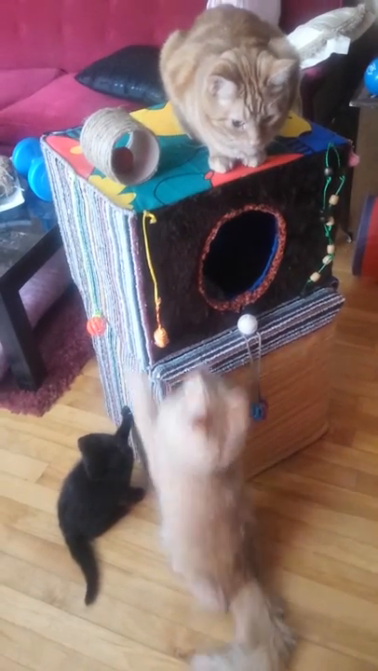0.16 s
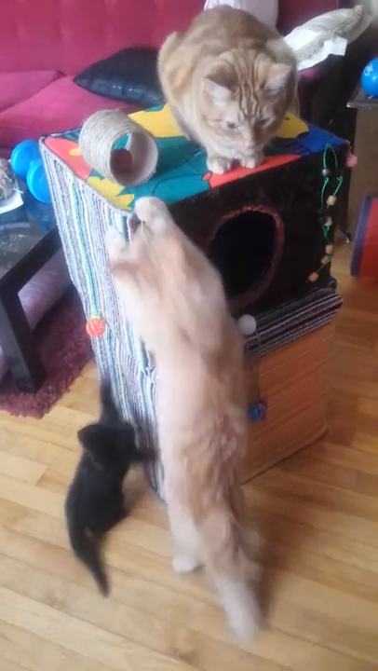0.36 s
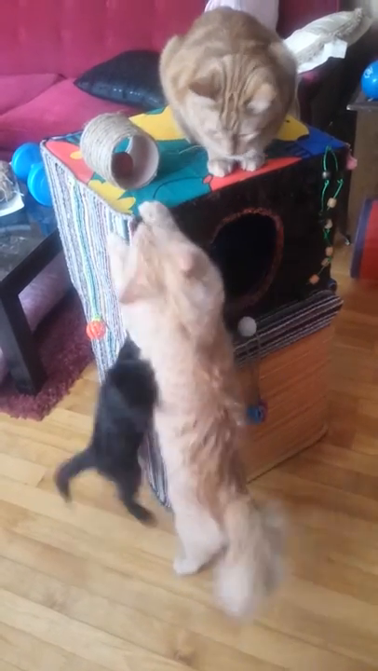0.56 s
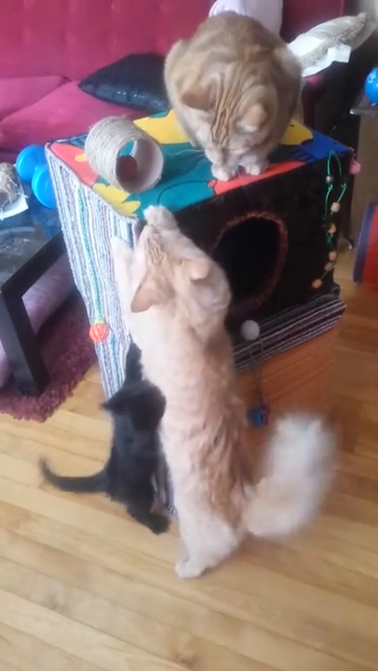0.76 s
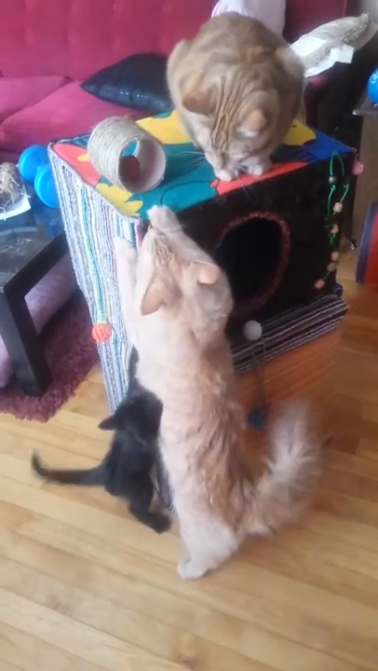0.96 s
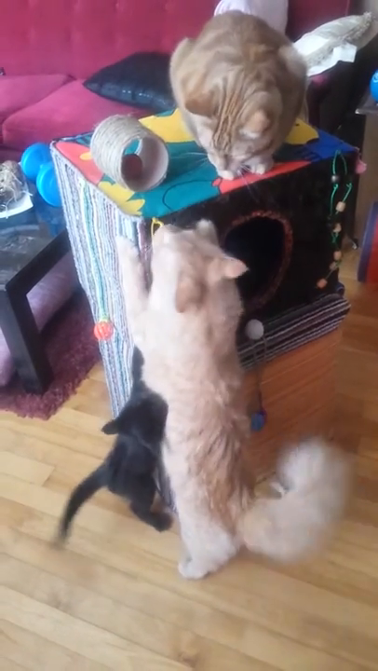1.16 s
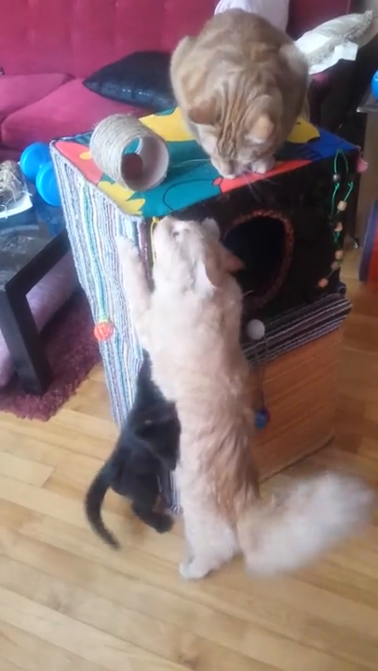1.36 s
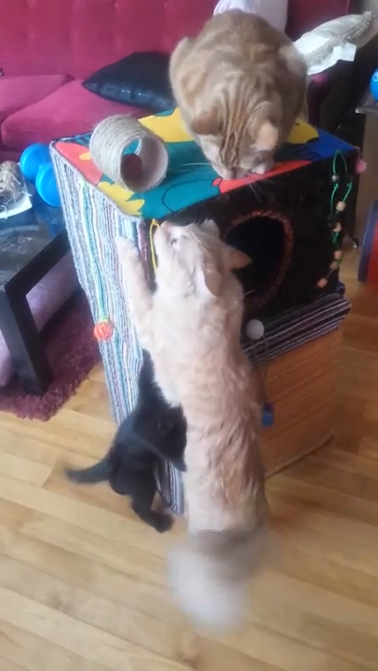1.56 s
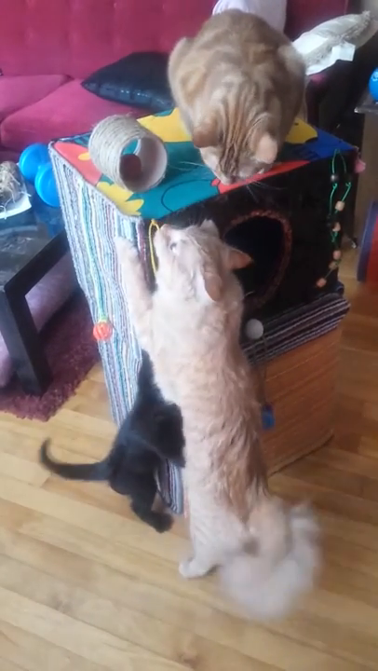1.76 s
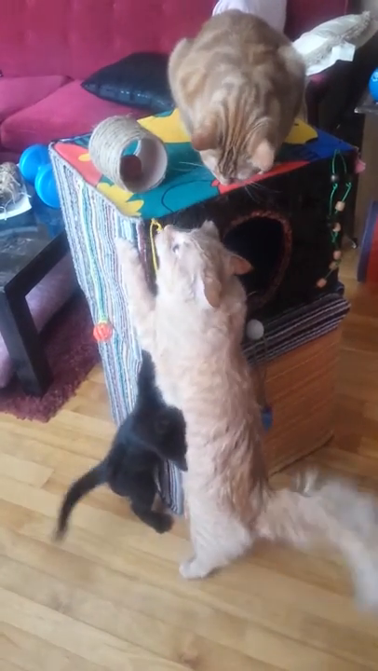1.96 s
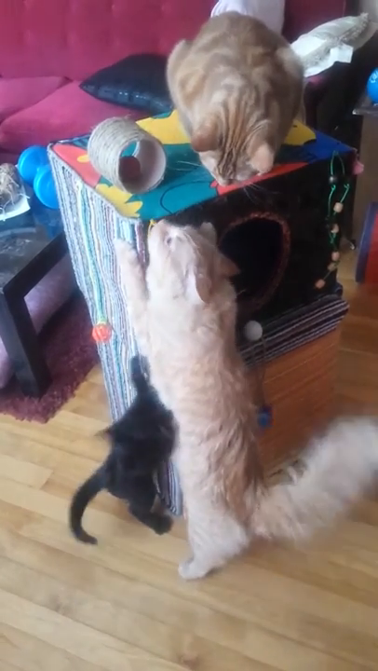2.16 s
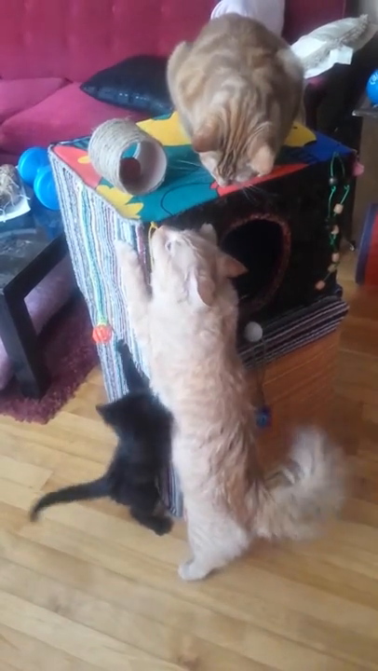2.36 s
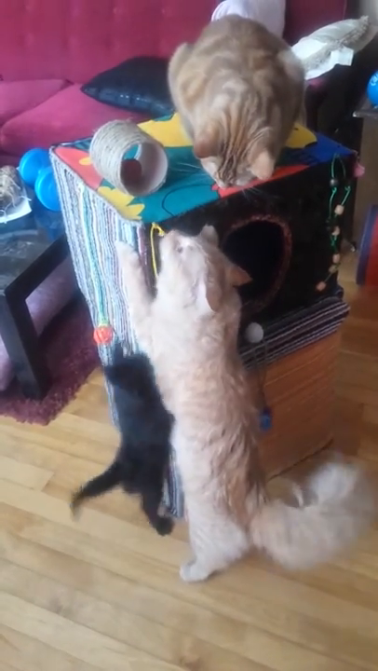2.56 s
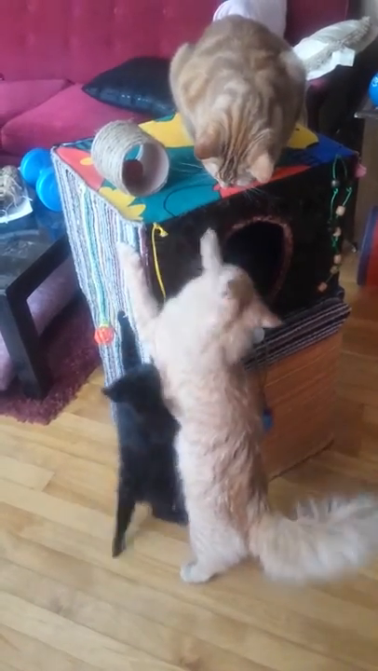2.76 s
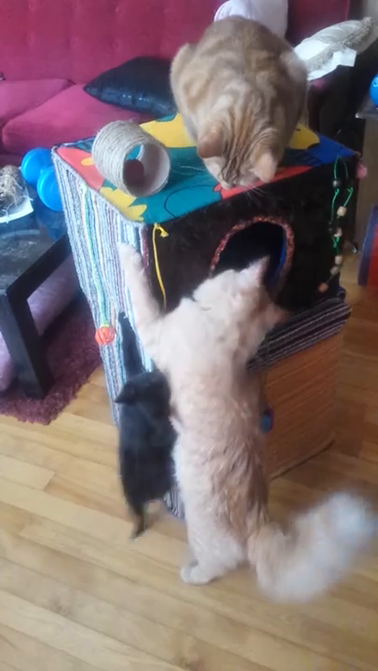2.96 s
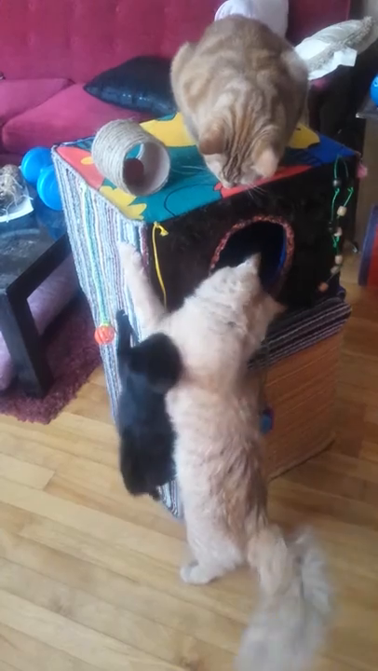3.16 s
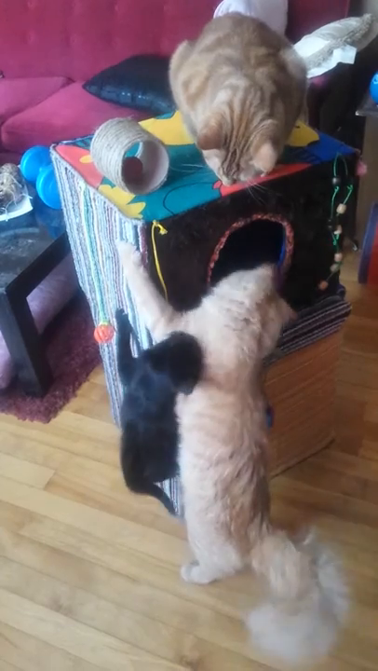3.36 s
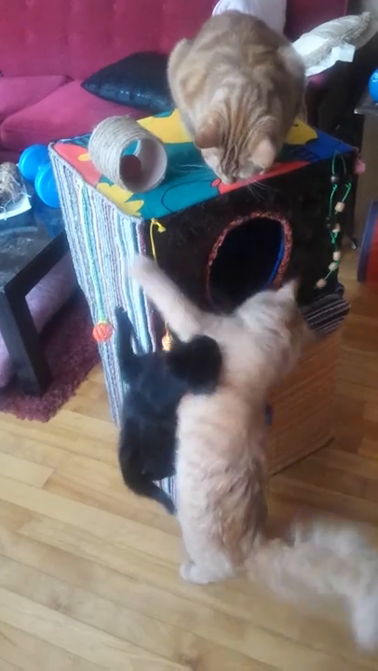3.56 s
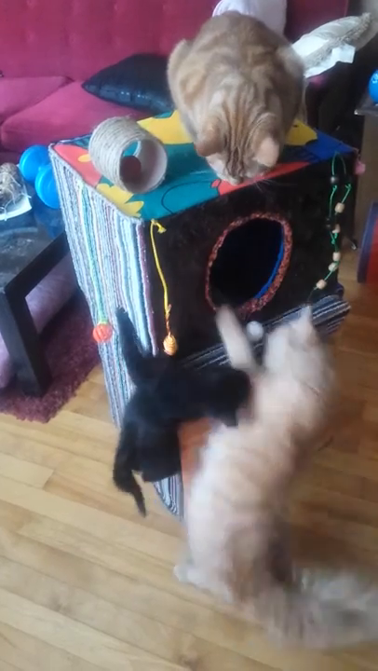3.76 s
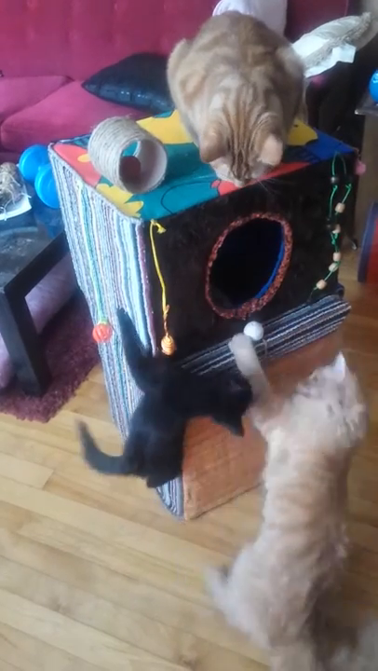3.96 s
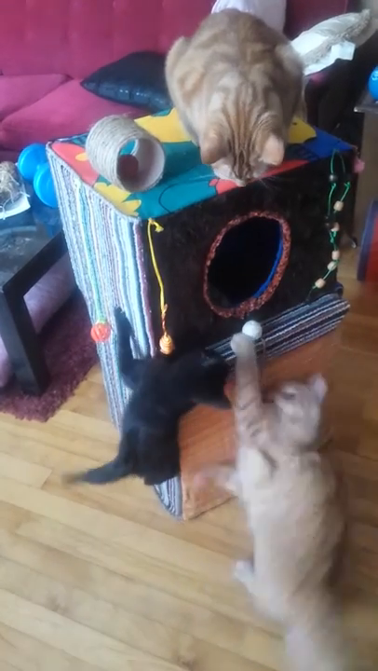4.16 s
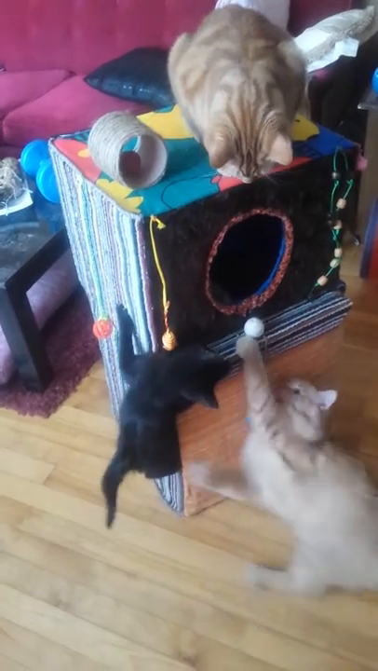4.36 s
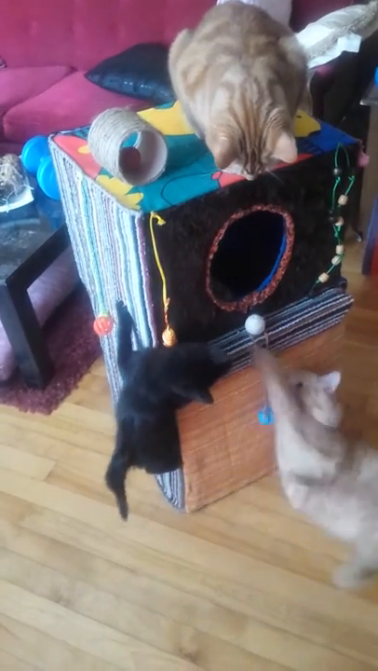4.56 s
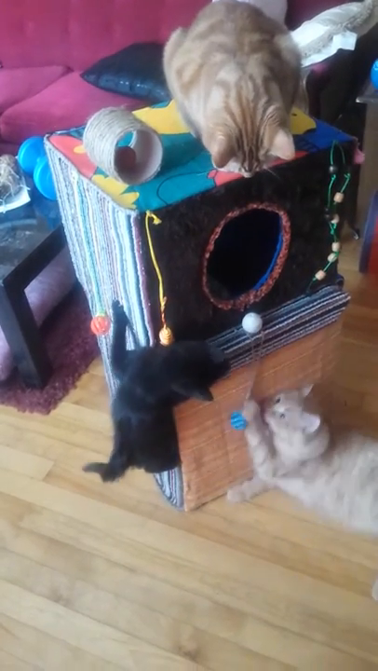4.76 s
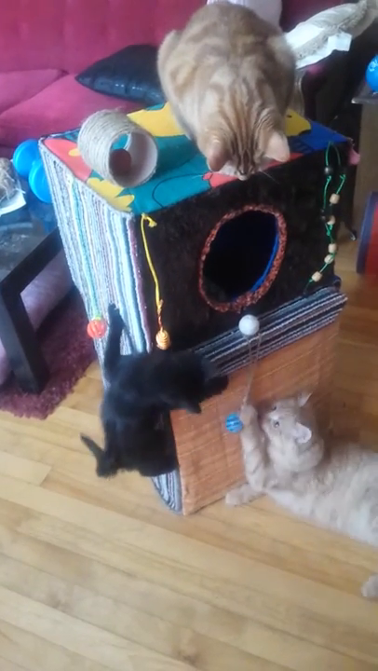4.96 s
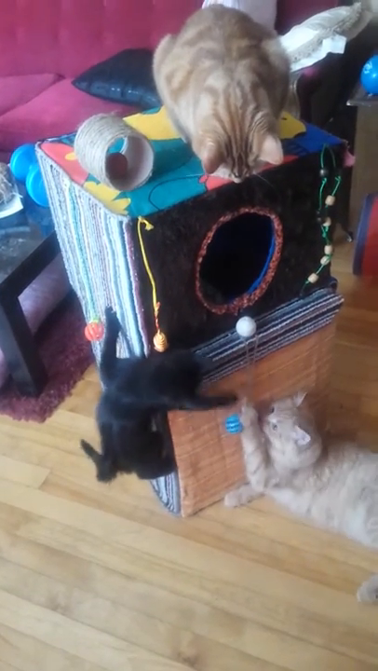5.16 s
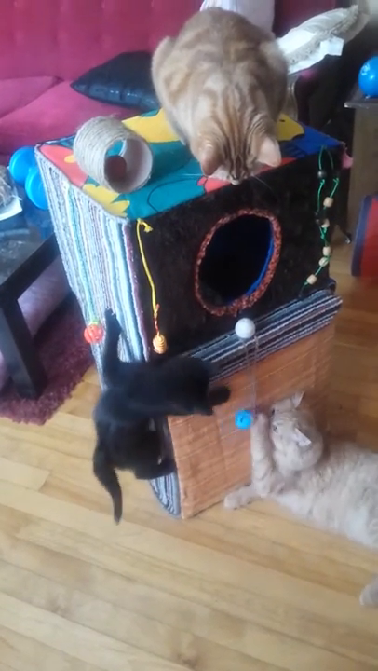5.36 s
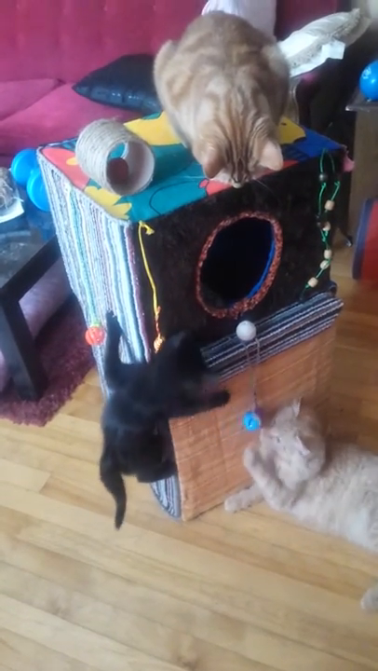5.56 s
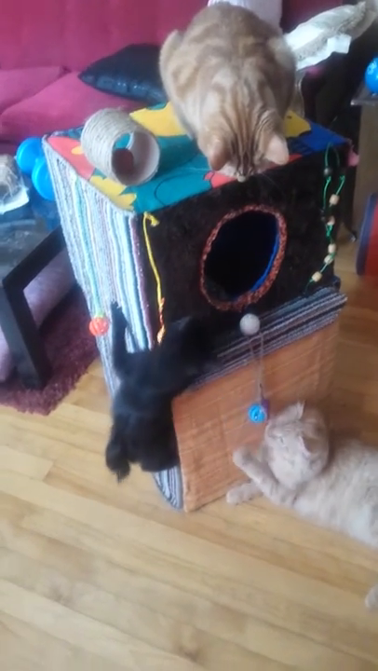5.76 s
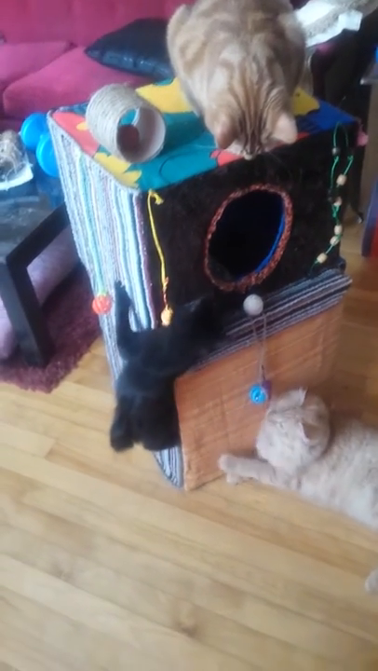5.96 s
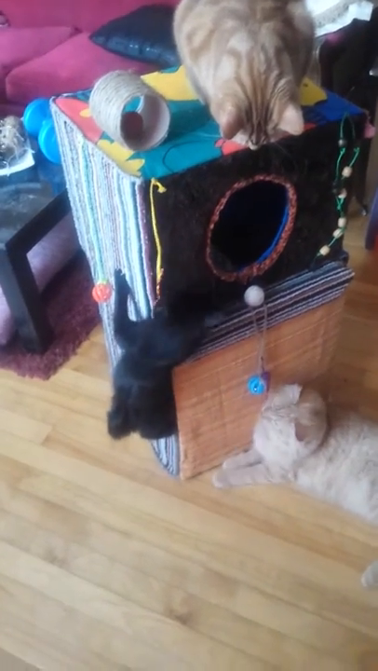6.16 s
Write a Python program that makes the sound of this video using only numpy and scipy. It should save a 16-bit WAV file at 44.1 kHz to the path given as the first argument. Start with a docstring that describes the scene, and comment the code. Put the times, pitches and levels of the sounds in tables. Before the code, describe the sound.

Kittens paw at a hollow cloth-covered box with soft thumps and claw scratches, building to a burst of knocks, clacks and a tiny bell jingle.

```python
"""In a quiet living room, kittens paw at and climb a cloth-covered box.
Paws excite the decaying modes of its hollow panels; claws tick as short noise bursts and rasp as
trains of snagged threads. A dangling toy jingles as its pellet excites the modes of a small bell.
An appliance hums and rushes as wavering sines and filtered noise; the microphones hiss and
lift the treble."""
import sys
import numpy as np
from scipy import signal
from scipy.fft import rfft, irfft, next_fast_len
from scipy.io import wavfile
from scipy.ndimage import map_coordinates

SR = 44100
rng = np.random.default_rng(int(sys.argv[2]) if len(sys.argv) > 2 else 0)


def store_wav(level_fs):
    """Save 16-bit WAV to argv[1]."""
    pcm = np.round(np.clip(np.atleast_2d(level_fs), -1, 1) * 32767)
    wavfile.write(sys.argv[1], SR, pcm.T.astype(np.int16))


N = 273861
T = np.arange(N) / SR  # time in the scene, s
AGE = T[:SR * 2 // 5]  # time since a contact, s; each contact sounds for 0.4 s


def amp(db):
    """Level: decibels become an amplitude gain."""
    return 10 ** (np.asarray(db) / 20)


def unit(x):
    """Normalization: the signal is scaled to rms 1."""
    return x / np.sqrt(np.mean(x ** 2) + 1e-20)


def along(points, hz):
    """Logarithmic frequency scale: (Hz, value) points are interpolated along it."""
    point_hz, values = np.transpose(points)
    return np.interp(np.log(hz + 1), np.log(point_hz + 1), values)


def fade(t60):
    """Exponential decay: the amplitude is 60 dB down after t60 seconds."""
    return np.exp(-np.log(1000) * AGE / t60)


def wobble(rate):
    """Slow random modulation: a smooth curve through `rate` random knots a second."""
    knots = rng.standard_normal(int(N * rate / SR) + 4)
    return map_coordinates(knots, [T * rate])


def filtered(x, response):
    """Linear filtering: the spectrum is multiplied by a response of frequency."""
    n = x.shape[-1]
    padded = next_fast_len(n + SR // 8)
    hz = np.fft.rfftfreq(padded, 1 / SR)
    return irfft(rfft(x, padded) * response(hz), padded)[..., :n]


def coloured(x, points, size=2048):
    """Minimum-phase filtering: folding the cepstrum makes the (Hz, dB) response causal."""
    gain = amp(along(points, np.fft.rfftfreq(size, 1 / SR)))
    cepstrum = irfft(np.log(gain))
    cepstrum[1:size // 2] *= 2
    cepstrum[size // 2 + 1:] = 0
    impulse = irfft(np.exp(rfft(cepstrum)))
    return signal.fftconvolve(x, impulse[None], axes=1)[:, :x.shape[-1]]


# Coherence of a diffuse field. Each row: frequency in Hz, left-right likeness from 0 to 1.
COHERENCE = [(100, 0.928), (350, 0.911), (700, 0.402), (1400, 0.043), (4000, 0.018)]


def diffuse(pair):
    """Diffuse-field coherence: two unrelated signals become stereo, alike in the bass."""
    def mid_side_gains(hz):
        turn = np.arccos(np.clip(along(COHERENCE, hz), -1, 1)) / 2
        return np.array([np.cos(turn), np.sin(turn)])

    mid, side = filtered(pair, mid_side_gains)
    return np.array([mid + side, mid - side])


def panned(balance_db):
    """Intensity stereophony: gains that set left minus right in dB."""
    return amp([[balance_db / 2], [-balance_db / 2]])


# Reverberation of the room. Each row: frequency in Hz, decay time t60 in seconds.
ROOM_DECAY = [(100, 0.395), (260, 0.34), (700, 0.2215), (1840, 0.2766), (6000, 0.1804), (14000, 0.25)]
# Tint of the echoes by sofa and rug. Each row: frequency in Hz, relative level in dB.
FURNISHING_TINT = [(500, 2), (8000, 2.5), (11000, 7.5), (13000, -2)]


def in_room(x, wet_db):
    """Statistical reverberation: the direct sound plus a decaying noise tail, new at each call."""
    hz, t, spectrum = signal.stft(rng.standard_normal((2, len(AGE))), SR, nperseg=256)
    decay = np.exp(-np.log(1000) * t / along(ROOM_DECAY, hz)[:, None])
    dying = amp(along(FURNISHING_TINT, hz))[:, None] * decay
    tail = signal.istft(spectrum * dying, SR, nperseg=256)[1]
    tail = diffuse(tail[:, :len(AGE)]) * (1 - fade(0.0129))  # echoes build up gradually
    tail /= np.linalg.norm(tail[0])
    return x + amp(wet_db) * signal.fftconvolve(x, tail, axes=1)[:, :len(AGE)]


def add(track, s, sound):
    """Superposition: a sound is mixed in at time s."""
    part = track[:, round(s * SR):][:, :sound.shape[-1]]
    part += sound[:, :part.shape[-1]]


# Tones of the appliance. Each row: frequency in Hz, mean rms level in dB before stereo and microphones.
HUM_TONES = [(143, -70), (173.6, -57), (208, -70.5), (802, -70), (1771, -84)]
# Spectrum of the appliance's rush. Each row: frequency in Hz, relative level in dB.
RUSH_SPECTRUM = [(25, -21.5), (70, -20), (105, -3), (150, -4.5), (190, -3.5), (310, -6.5), (400, -15),
                 (600, -12.5), (790, -11), (1000, -15.5), (1500, -20.5), (2200, -25), (4000, -29),
                 (8000, -64)]
# Spectrum of the microphones' own noise. Each row: frequency in Hz, relative level in dB.
HISS_SPECTRUM = [(500, -15.5), (2500, -5), (4500, 4), (7500, 6), (11000, 0), (15000, -1.5)]


def background(air_db=-59, hiss_db=-68):
    """Stationary tones and noise: an appliance hums and rushes, and the microphones hiss."""
    hum = np.zeros(N)
    for hz, db in HUM_TONES:
        level = amp(db + 0.8 * wobble(9)) * np.sqrt(2)
        hum += level * np.sin(2 * np.pi * hz * T + 0.25 * wobble(6))
    air = unit(coloured(diffuse(rng.standard_normal((2, N))), RUSH_SPECTRUM, size=8192))
    hiss = unit(coloured(rng.standard_normal((2, N)), HISS_SPECTRUM))

    def hiss_gains(hz):
        # left minus right in dB: the right microphone hisses more around its resonance
        lean = along([(2500, -2.5), (4400, 0.5), (7500, -15.0), (10000, -4.5), (14000, 0.5)], hz)
        return amp([lean / 2, -lean / 2])

    return (hum + amp(air_db) * air) * panned(1) + amp(hiss_db) * filtered(hiss, hiss_gains)


# Modes of the box's panels and cavity. Each row: nominal frequency in Hz, relative level in dB,
# t60 in seconds.
BOX_MODES = [(92.85, -1.5, 0.254), (133.02, -4.5, 0.1273), (166.6, -11.5, 0.1485), (187.18, 0, 0.067),
             (238.8, -12, 0.0875), (266.3, -7.5, 0.0843), (309.8, -1.5, 0.0704), (321.3, -4.5, 0.046),
             (376.4, -8, 0.0266), (451.9, -11.5, 0.0732), (521.4, -11, 0.1006), (658.4, -15, 0.0885),
             (785, -8, 0.0367), (939, -17, 0.099)]
# Paws and batted toys hitting the box. Each row: start in seconds, relative thump level in dB,
# hardness (push on the middle modes) in dB, deep boom over the thump in dB,
# relative claw or toy snap level in dB.
BLOWS_ON_BOX = [(0.1628, -51.5, 5, -16.5, -49), (0.1891, -48.5, 0.5, -17.5, -47.5),
                (0.363, -48, 6, -1.5, -52.5), (0.5698, -53.5, 3.5, 5, -38), (0.6655, -36, -9.5, -21.5, -55),
                (1.091, -52.5, 5.5, -13.5, -42.5), (2.598, -52.5, 5.5, -1, -44),
                (2.7131, -40, 13.5, 3, -44), (2.852, -52, -4.5, -20, -35.5), (3.049, -43, -5.5, -4, -48),
                (3.224, -45.5, 4, -13, -38), (3.5123, -45, 8, -0.5, -51), (3.6057, -48, -1.5, -14.5, -38.5),
                (3.642, -44.5, -0.5, -5, -42.5), (3.8596, -45, 12.5, -3.5, -36.5),
                (4.202, -38.5, -12, -14, -66.5), (4.377, -30.5, 0, -12, -15.5),
                (4.467, -33.5, 8.5, -11, -49), (4.6141, -31, 0.5, -18.5, -17.5),
                (4.729, -23, -0.5, -24, -37), (4.744, -26.5, 9, -13, -46), (4.9699, -33, -4.5, -18, -39.5),
                (5.199, -44.5, -4.5, -22, -38.5), (5.335, -50.5, -0.5, 1, -64.5),
                (5.415, -43.5, 0.5, -11, -35), (5.595, -44, -3, -15.5, -33.5), (5.83, -56, 2.5, -17, -61)]
# after each blow the weight settles with a softer second thump
SETTLE_S, SETTLE_DB, SETTLE_SOFTER_DB = 0.024, -8, -8.5
LOW_LIFT_DB = 2.5  # every blow gets a small lift around 135 Hz, a low box mode
# hard blows slap the upper modes; heavy ones push longer and slap less (dB, dB per dB, dB per dB)
SLAP_DB, SLAP_PER_HARDNESS, SLAP_PER_THUMP = -18.5, 0.54, -0.3245


def thumps(level_db=6, wet_db=-7, scatter_db=1.0, rise_cycles=2.16):
    """Modal excitation: soft paws wake the low modes of the box, hard knocks the higher ones."""
    out = np.zeros((2, N))
    hz, mode_db, t60 = np.transpose(BOX_MODES)
    # the large, low modes take longer to get going
    swell = (1 - fade(rise_cycles / hz[:, None])) ** 2 * fade(t60[:, None])
    landings = [(s, db, hard_db, boom_db) for s, db, hard_db, boom_db, _ in BLOWS_ON_BOX]
    settlings = [(s + SETTLE_S, db + SETTLE_DB, hard_db + SETTLE_SOFTER_DB, boom_db)
                 for s, db, hard_db, boom_db in landings]
    for s, db, hard_db, boom_db in landings + settlings:
        slap_db = SLAP_DB + SLAP_PER_HARDNESS * hard_db + SLAP_PER_THUMP * db
        force = [(95, boom_db), (135, LOW_LIFT_DB), (195, 0), (310, hard_db), (380, hard_db), (520, slap_db)]
        scatter = scatter_db * rng.standard_normal(len(hz))
        # the struck spot sets the sign of each mode
        signs = rng.choice([-1, 1], len(hz))
        gains = amp(mode_db + along(force, hz) + scatter) * signs
        # each hit's mode pitches scatter slightly at random
        pitch = hz * (1 + 0.00833 * rng.standard_normal(len(hz)))
        ring = gains @ (np.sin(2 * np.pi * pitch[:, None] * AGE) * swell)
        add(out, s, amp(db + level_db) * in_room(ring[None], wet_db))
    return out * panned(1)


# Claws and toys ticking with no weight behind them. Each row: start in seconds,
# relative level in dB, relative woody clack level in dB.
WEIGHTLESS_TICKS = [(0.2555, -28.5, -22), (1.923, -41, -28.5), (3.1487, -52.5, 11.5), (3.8114, -53.5, 12),
                    (3.8836, -42, 8), (3.919, -41, 0.5), (4.2472, -34.5, -23), (4.2619, -33, -8),
                    (4.735, -25, -10), (4.7597, -12, -13), (4.7937, -22, -14), (4.8424, -37, 4),
                    (4.8683, -31, -8), (4.9219, -36.5, 2.5), (5.001, -33.5, -9), (5.449, -29, -24.5)]
# Spectrum of a hard snap before tilting. Each row: frequency in Hz, relative level in dB.
SNAP_SPECTRUM = [(900, -24), (2700, -1), (3500, -2.5), (5200, 4.5), (7000, 6.5), (9000, -7), (12000, -17),
                 (16000, -21)]
# Spectrum of the woody clack. Each row: frequency in Hz, relative level in dB.
CLACK_SPECTRUM = [(250, -17.5), (450, -2.5), (800, -3.5), (1300, -9.5), (2200, -12.5), (3300, -28),
                  (6000, -20.5), (12000, -40)]
# the more weight behind a snap, the more wood is heard (dB, dB per dB, dB per dB)
WOODY_DB, WOODY_PER_THUMP, WOODY_PER_HARDNESS = 4, 0.438, 0.581
# the woodier a contact, the duller its snap (dB per octave; the same per dB of clack)
SNAP_TILT, DULLER_PER_WOODY = -4.5, 0.395
CLAW_BALANCE_DB = -0.5  # left minus right


def clicks(tick_db=-34, clack_db=-28, tick_t60=0.00702, clack_t60=0.0223, wet_db=-2.5):
    """Impulsive contact: a short bright noise burst lies on top of a longer woody clack."""
    out = np.zeros((2, N))
    heavy = []
    for s, thump_db, hard_db, _, snap_db in BLOWS_ON_BOX:
        woody_db = WOODY_DB + WOODY_PER_THUMP * (thump_db - snap_db) + WOODY_PER_HARDNESS * hard_db
        heavy.append((s, snap_db, woody_db))
    for s, db, woody_db in heavy + WEIGHTLESS_TICKS:
        tilt = SNAP_TILT - DULLER_PER_WOODY * woody_db
        colour = [(hz, level + tilt * np.log2(hz)) for hz, level in SNAP_SPECTRUM]
        snap = unit(coloured(rng.standard_normal((2, len(AGE))) * fade(tick_t60), colour))
        wood_noise = diffuse(rng.standard_normal((2, len(AGE)))) * fade(clack_t60)
        wood = unit(coloured(wood_noise, CLACK_SPECTRUM))
        contact = amp(tick_db) * snap * panned(CLAW_BALANCE_DB) + amp(clack_db + woody_db) * wood
        add(out, s, amp(db) * in_room(contact, wet_db))
    return out


# Scrapes of claws on cloth, long and short, and brief bursts of toy clatter. Each row:
# middle in seconds, half length (to 1/e) in seconds, relative rasp level in dB,
# relative panel rustle level in dB.
SCRAPES = [(0.236, 0.0303, -69, -50.5), (0.414, 0.0506, -54, -54), (0.644, 0.25, -64, -59),
           (1.298, 0.0316, -64, -57.5), (2.8, 0.143, -59.5, -53), (3.62, 0.0237, -54, -57.5),
           (3.749, 0.13, -58, -55.5), (3.886, 0.047, -55.5, -55), (4.276, 0.0424, -53, -56.5),
           (4.74, 0.0085, -36, -39.5), (4.77, 0.0133, -33, -46), (4.834, 0.2625, -55, -48),
           (5.515, 0.257, -57, -56.5)]
# Spectrum of claws on cloth. Each row: frequency in Hz, relative level in dB.
RASP_SPECTRUM = [(700, -2.5), (1500, 0), (3300, 1.5), (5200, -0.5), (7500, -1), (10000, -9), (16000, -21.5)]
# Spectrum of the rustling panel. Each row: frequency in Hz, relative level in dB.
RUSTLE_SPECTRUM = [(30, -10), (65, -7.5), (95, -8), (150, 9.5), (320, 1), (480, -1.5), (850, -3.5),
                   (1500, -18), (3000, -36)]
# every blow also ends in a short slip over the cloth
DRAG_DELAY_S, DRAG_HALF_S = 0.02184, 0.02683
# the deeper the claws go in, the louder they rasp (dB, dB, dB per dB of snap)
DRAG_RASP_DB, DRAG_RUSTLE_DB, DRAG_PER_SNAP = -47, -56, 0.387


def scratches(level_db=-4, rustle_db=0, snags_per_s=300, fuzz=1.29, jerk_db=1.5, balance_db=-2.5):
    """Friction noise: claws snag thread after thread in uneven jerks, and the panel rustles."""
    snags = (rng.random(N) < snags_per_s / SR) * rng.standard_normal((2, N))
    rasp = unit(coloured(unit(snags) + fuzz * rng.standard_normal((2, N)), RASP_SPECTRUM))
    rustle = unit(coloured(diffuse(rng.standard_normal((2, N))), RUSTLE_SPECTRUM))
    slips = [(s + DRAG_DELAY_S, DRAG_HALF_S, DRAG_RASP_DB + DRAG_PER_SNAP * snap_db, DRAG_RUSTLE_DB)
             for s, *_, snap_db in BLOWS_ON_BOX]
    claw, panel = np.zeros(N), np.zeros(N)
    for s, half, rasp_db, panel_db in SCRAPES + slips:
        stroke = np.exp(-((T - s) / half) ** 2)
        claw += amp(rasp_db + level_db) * stroke
        panel += amp(panel_db + rustle_db) * stroke
    jerks = amp(jerk_db * wobble(90))
    return (claw * rasp * panned(balance_db) + panel * rustle) * jerks


# Modes of the toy's cage and the bell's slit shell. Each row: frequency in Hz, relative level in dB,
# free t60 in seconds.
BELL_MODES = [(2812, -15.5, 0.174), (2970, -44, 0.13), (5705, -12.5, 0.62), (5820, -10, 0.28),
              (6564, -4.5, 0.065), (6496, 5, 0.387), (6617, -4.5, 0.048), (12980, -19, 0.206),
              (13200, -31.5, 0.19), (14510, -12, 0.41)]
# Shakes of the toy, its pellet flying across the bell and back. Each row: start in seconds,
# relative level in dB, seconds until the pellet is back, share of the free ringing time.
TOY_SHAKES = [(1.45, -56.5, 0.037, 0.64), (4.7328, -26, 0.0321, 0.76), (4.831, -35, 0.02, 0.85),
              (4.931, -38, 0.0118, 1.0), (5.152, -54.5, 0.0119, 0.62), (5.306, -44.5, 0.026, 0.71),
              (5.45, -34, 0.016, 0.79), (5.551, -38.5, 0.0161, 0.91)]
RETURN_DB = 1.66  # the pellet's return over its first strike
# Place of the dangling toy. Each row: time in seconds, left minus right in dB.
TOY_SWING = [(4.75, 4), (4.95, 12.5), (5.35, 4.5), (5.47, -1.5)]


def bell(level_db=-23, wet_db=-8, scatter_db=2, contacts_per_s=900, skitter_t60=0.0273,
         rattle_db=-11, rattle_t60=0.059):
    """Damped modal ringing: a skittering pellet excites the shell; paws and cloth shorten the ring."""
    out = np.zeros((2, N))
    hz, mode_db, t60 = np.transpose(BELL_MODES)
    strikes = []
    for s, db, back, free in TOY_SHAKES:
        strikes += [(s, db, free), (s + back, db + RETURN_DB, free)]
    for s, db, free in strikes:
        contacts = (rng.random(len(AGE)) < contacts_per_s / SR) * rng.standard_normal(len(AGE))
        skitter = contacts * fade(skitter_t60)
        decay = fade(t60[:, None] * np.clip(free, 0.1, 2))
        modes = np.exp(2j * np.pi * hz[:, None] * AGE) * decay
        rings = signal.fftconvolve(modes, skitter[None], axes=1)[:, :len(AGE)]
        gains = amp(mode_db + scatter_db * rng.standard_normal(len(hz))) / rings.std(axis=1)
        # each mode reaches the two microphones in its own phase
        phases = np.exp(2j * np.pi * rng.random((2, len(hz))))
        ring = unit(((gains * phases) @ rings).real)
        # the fifth power makes the noise spiky
        spikes = rng.standard_normal((2, len(AGE))) ** 5
        rattle = unit(coloured(spikes, SNAP_SPECTRUM) * fade(rattle_t60))
        jingle = in_room(ring + amp(rattle_db) * rattle, wet_db)
        balance_db = np.interp(s, *np.transpose(TOY_SWING))
        add(out, s, amp(db + level_db) * jingle * panned(balance_db))
    return out


def scene():
    """Superposition: the kittens' play is summed over the quiet room."""
    return background() + thumps() + clicks() + scratches() + bell()


# Response of the microphones with their port resonance. Each row: frequency in Hz, gain in dB.
MICROPHONE_RESPONSE = [(25, 1), (80, -1), (4000, 0), (5200, 3.5), (6500, 7.5), (7500, 6.5), (9000, 3.5),
                       (11000, 3), (15000, 3.5)]
TOP_HZ = 16200  # band limit


def record(dry):
    """Transducer response: the port resonance lifts the treble, and the band ends at its limit."""
    heard = coloured(dry, MICROPHONE_RESPONSE, size=4096)
    return filtered(heard, lambda hz: hz < TOP_HZ)


dry = scene()
out = record(dry)
store_wav(out)
```